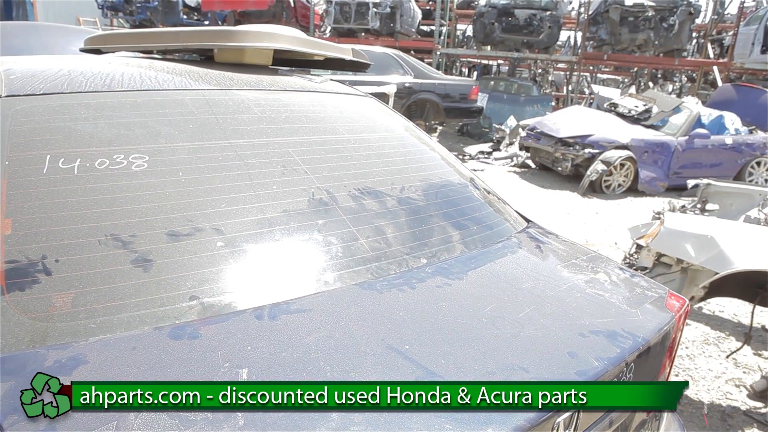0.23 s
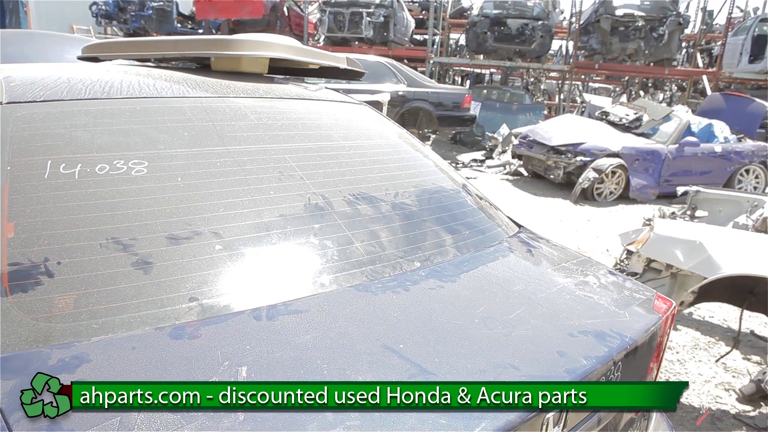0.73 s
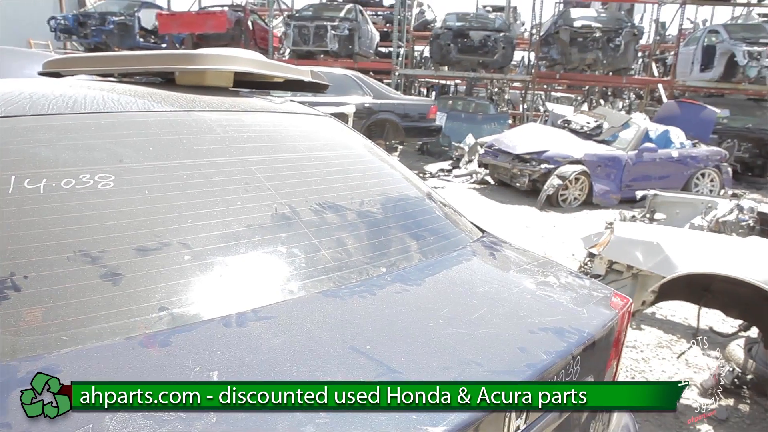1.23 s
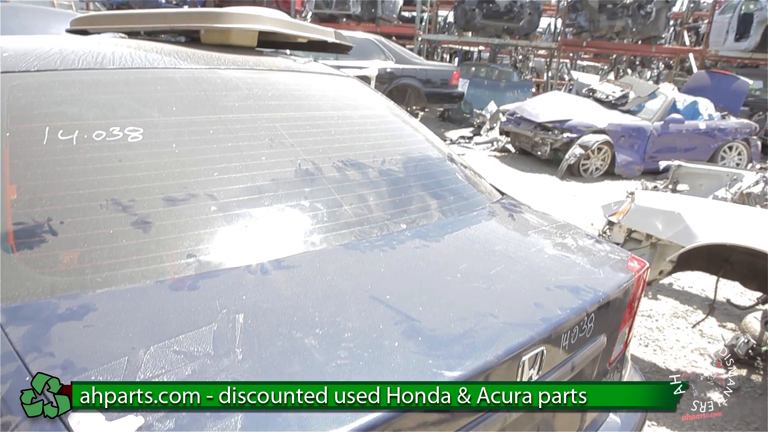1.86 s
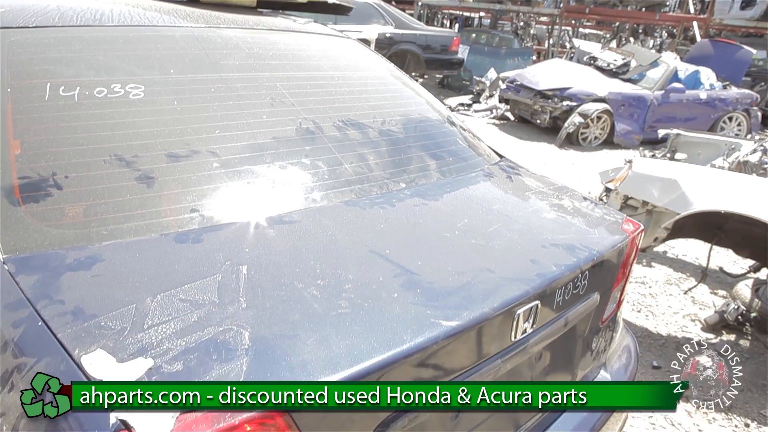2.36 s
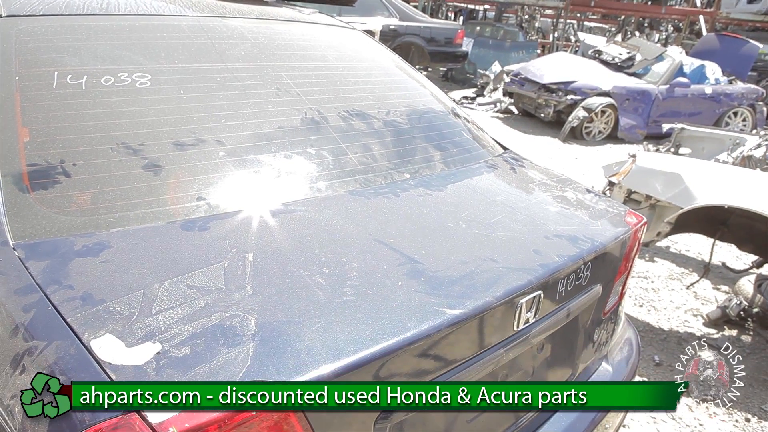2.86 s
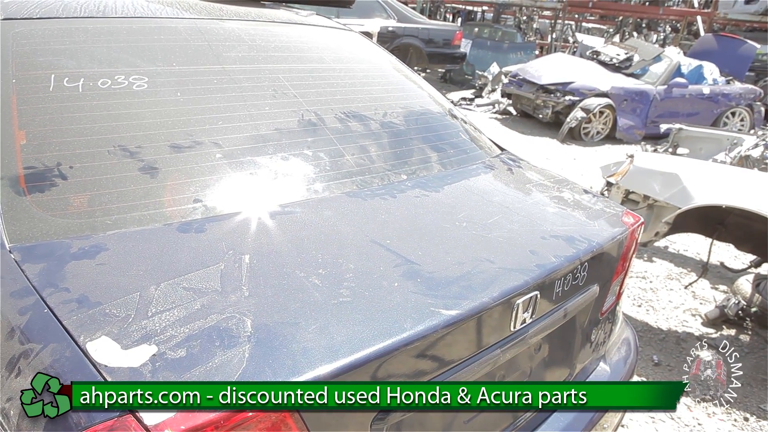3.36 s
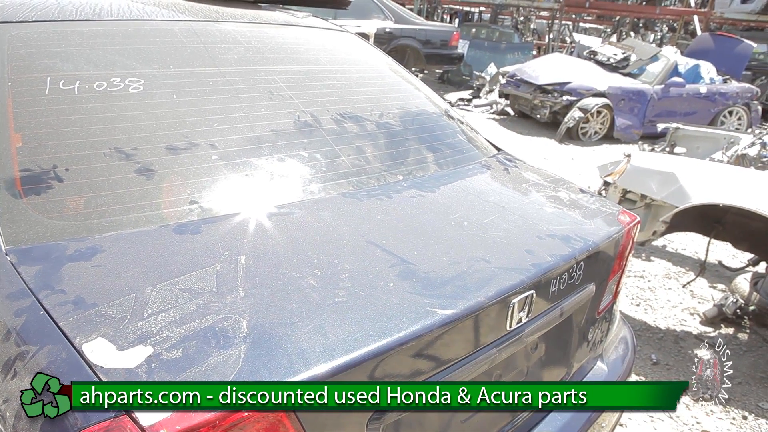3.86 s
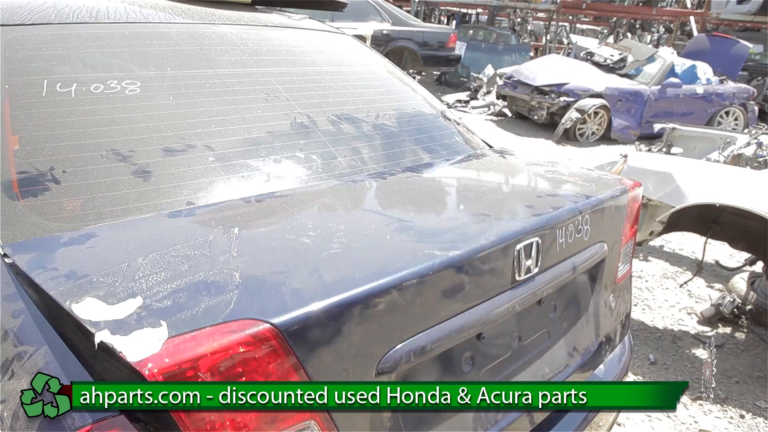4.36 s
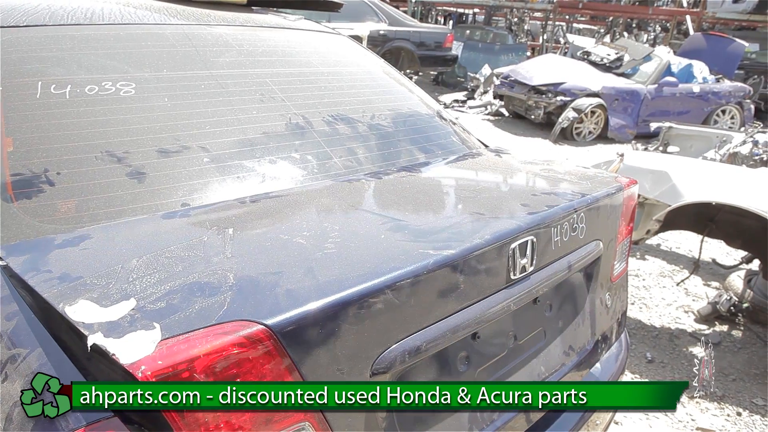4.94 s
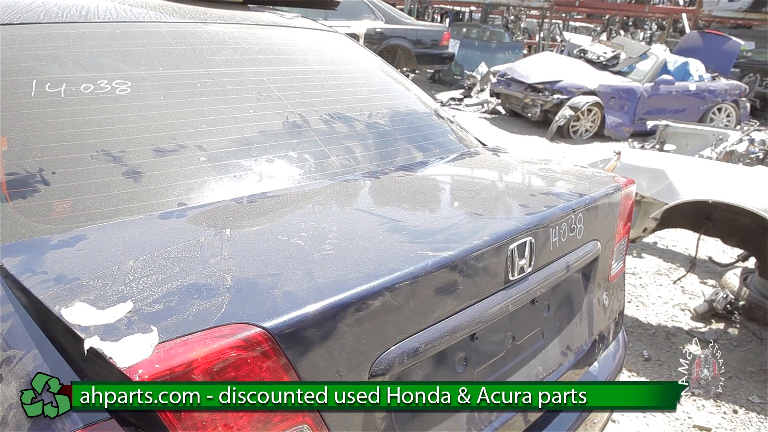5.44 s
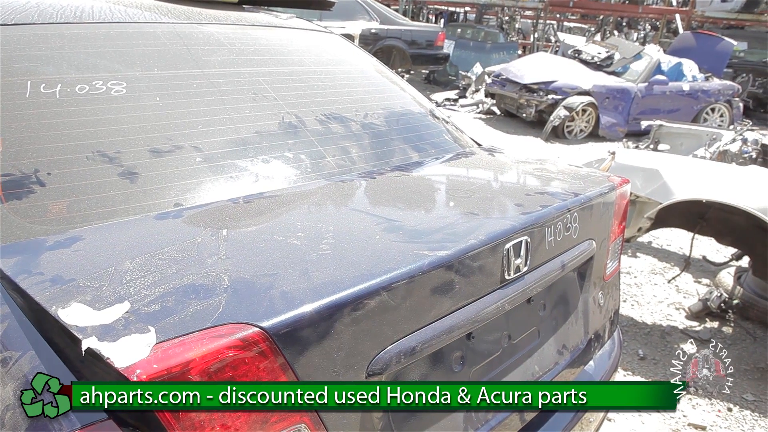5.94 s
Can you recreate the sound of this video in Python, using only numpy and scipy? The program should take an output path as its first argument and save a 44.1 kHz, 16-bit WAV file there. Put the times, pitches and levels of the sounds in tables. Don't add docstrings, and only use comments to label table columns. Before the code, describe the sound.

A near microphone at a car's rear catches restless low rumble, small ticks and dull knocks. One boomy lid push comes first, followed by softer bumps and a hollow knock. A nearby machine hums low underneath. Then the trunk slams with the loudest thump and bright metal clacking, the latch rattles again, and the open yard settles into drone, hiss and faint seal rustle.

```python
import sys
import numpy as np
from scipy import signal
from scipy.io import wavfile
from scipy.ndimage import uniform_filter1d

SR = 44100
rng = np.random.default_rng(int(sys.argv[2]) if len(sys.argv) > 2 else 0)


def output_pcm(signal):
    pcm = np.clip(np.atleast_2d(signal).T, -1, 1) * 32767
    wavfile.write(sys.argv[1], SR, np.round(pcm).astype(np.int16))


def invert_db(x):
    u = np.asarray(x, float) / 20
    return 10 ** u


N = 273861

# frequency in Hz, density in dB per Hz.
RUMBLE_SPECTRUM = [(15, -5), (27, 5), (42, 6), (55, -7.5), (75, -18.5), (120, -69)]
DRONE_SPECTRUM = [(35, -7), (55, 5.5), (75, 4), (100, -13), (135, -19.5), (170, -24.5), (300, -79.5)]
YARD_SPECTRUM = [(82, -12.5), (140, 2.5), (363, -7), (430, -4), (509, -15.5), (569, -7.5), (611, -11),
                 (843, -16.5), (943, -17), (4000, -40), (5200, -76), (8800, -120)]
HISS_SPECTRUM = [(880, -28), (1500, -4.5), (2500, -5.5), (4400, -5.5), (13500, -8.5), (16000, -14)]
SEAL_SPECTRUM = [(300, -29.5), (600, 1), (900, 1), (1500, -3.5), (2500, -16), (5000, -19), (9000, -50)]
HISS_DB, DRONE_DB, YARD_DB = -81.2, -53, -68

# time in seconds, level in dB, pitch in Hz.
CABIN_AIR = [(0, -49, 33.46), (.28, -36.5, 33.05), (.46, -36.5, 25.94), (.7, -39.5, 31.48),
             (1.26, -36.5, 27), (1.48, -40, 26), (1.7, -39.5, 25.76), (2.101, -29.5, 27.96),
             (2.19, -43.5, 27.68), (2.3, -36, 28.7), (2.481, -26, 33.88), (2.6, -35, 38.54), (3.2, -38, 40),
             (3.9, -37.5, 39.95), (4.26, -27, 29), (4.5, -32, 38.52), (4.78, -36.5, 41.05),
             (6.21, -35.5, 41)]
# multiple of the cabin pitch, level in dB.
ENGINE_ORDERS = [(2, -14), (4.5, -31)]
ENGINE_START_S = 2.01
# start in seconds, level in dB, t60 in seconds.
SHAKES = [(0.049, -48, 3.5), (1.13, -35.5, 0.6), (1.49, -38, 4.9), (1.64, -31, 0.3), (1.73, -28, 0.82),
          (2.27, -30, 0.78), (2.45, -45, 1.26), (3.9, -37.5, .6), (3.975, -20.5, .7), (4.2, -41.5, 2.7),
          (4.77, -46.5, 1.26), (5.11, -48.5, 1.86), (5.45, -46, 2.7), (5.801, -43.5, 3.5)]
WAKE_DB, WAKE_T60_S = -60.5, 5.73

# time in seconds, level in dB.
SEAL_CREEP = [
    (4.599, -83),
    (4.814, -85.5),
    (5.103, -66.5),
    (5.258, -68),
    (5.832, -70.5),
    (6.102, -79.5),
    (6.21, -80),
]

# lowest mode in Hz, highest mode in Hz, t60 in seconds, share of the rattle length.
FLOORPAN = (110, 270, .11, 1.1)
PANEL = (292.7, 645, 0.069, 1.02)
SKIN = (645, 1720, 0.049, 1.1)
LATCH = (1720, 5600, 0.013, 1)
FIZZ = (5760, 15800, 0.015, 0.56)
MODE_COUNTS = (6, 10, 24, 60, 60)
LEANS_DB = (0, 1, -8, 6, -5)
DULL_SHARE_DB = (1.5, -0.5, -7, -21.5, -33)
SHARP_SHARE_DB = (-8, 0, -7, -17.5, -20.5)
DULL_TILT = (-0.76, 0, 1.35, 2.1, 3)
SHARP_TILT = (-0.9, -0.5, 0.55, 2.5, 3)
TICK_T60_S, KNOCK_T60_S, CLACK_T60_S = 0.18, 0.13, 0.079

# start in seconds, strength in dB, hardness in dB.
TICKS = [(.243, -73, 0), (.296, -70.5, 6), (.363, -61, 4.5), (.429, -75, 9.5), (.626, -63.5, 5),
         (.923, -62, 4.5), (.968, -63.5, 6), (1.019, -72.5, 6.5), (1.899, -66.5, 3), (2.659, -71, -2),
         (2.731, -62, 1), (2.9, -66, 4.5), (2.939, -64, 2.5), (3.519, -75, 7), (3.66, -72, 0.5),
         (4.868, -71, -4), (5.393, -62.5, 4), (5.519, -75.5, 8), (5.613, -69, 6.5), (6.05, -63.5, 1.5)]
# start in seconds, strength in dB, hardness in dB.
KNOCKS = [(1.093, -61.5, .1), (1.123, -52, 1), (1.177, -54, 1), (1.193, -52.5, -7), (1.239, -64, -3),
          (1.533, -57.5, -1.5), (1.599, -54.5, -5), (1.658, -43.5, 1), (1.675, -43, -2.5), (1.699, -54, -8),
          (2.185, -56, -8), (2.244, -51.5, -5), (2.528, -55.5, -6.5), (2.614, -55.5, 5.5),
          (2.625, -51, 3.5), (3.8, -58, 3), (3.829, -51, 1), (4.41, -47.5, -5), (4.429, -48.5, -5)]
# start in seconds, strength in dB, hardness in dB,
# first gap in seconds, loss per rock in dB.
ROCKS = [
    (1.722, -35.5, -4.5, 0.028, 5.5),
    (2.273, -38.5, -7, .035, 9.5),
    (4.075, -42, -7.5, .028, 4),
]
GAP_GROWTH, HARDENING_DB = 1.2, 1.4

# frequency in Hz, level in dB, t60 in seconds.
BOX_MODES = [(394, 7, 0.19), (664, -19, 0.41), (860, -24, 0.099), (990, -28, 0.14)]
BOX_S, BOX_DB = 2.622, -44.5
# frequency in Hz, level in dB, t60 in seconds.
ROD_MODES = [(2799, -4, .42), (3257, -8, .3), (3408, 0, .6), (3472, -5, .7), (3655, -8, .5),
             (3763, -8, .45), (3892, -5, .42), (4134, -10, .25)]
SLAM_S, ROD_DB, ROD_HELD_S = 3.977, -50.5, 0.339

# start in seconds, panel, skin, latch and fizz levels in dB,
# t60 in seconds.
STRIKER_SLIDE = (3.940, -37, -42, -53, -63, .4)
# start in seconds, strength in dB, hardness in dB.
CLACKS = [(3.871, -46.5, -1), (3.885, -43, 0), (3.898, -37, -0.4), (3.92, -39, -2), (3.972, -15.5, 1.5),
          (3.979, -20, 3), (3.993, -37, 0.5), (4.011, -29.5, 1), (4.028, -31, -1.5), (4.05, -47.5, 4),
          (4.226, -55, -5), (4.247, -57.5, 3), (4.268, -52, 1), (4.288, -42.5, -0.5), (4.303, -35, 0.5),
          (4.324, -37.5, 0.5), (4.349, -28.5, 1.5), (4.359, -39, 2.2), (4.368, -32, 0.2),
          (4.378, -34, -3.5), (4.389, -54, -2), (4.61, -57, 2.5), (5.177, -52.5, 4)]
PAWL_HZ, PAWL_WIDTH_HZ, PAWL_DB = 3390, 780, 2.5

# frequency in Hz, peak level in dB,
# t60 in seconds, rise in seconds, early pitch lift as a share.
THUMPS = [
    (1.7198, [(19.5, -19, .75, .025, 2.0), (28.7, -8, .96, .006, 1.56), (51.4, 2.5, .2, .012, .12), (58.2, -19, .49, .003, 1.9)]),
    (3.9665, [(26.8, -15, 1.2, .04, .64), (20, 7.3, .25, .026, 1.79), (41.2, -2.7, .43, .04, 1.2), (46.7, -5.4, .36, .002, -.4)]),
]


def read(points, hz):
    f, value = np.transpose(points)
    return np.interp(np.log(hz + 1), np.log(f + 1), value)


def add(mix, start_s, sound):
    part = mix[round(start_s * SR):][:len(sound)]
    part += sound[:len(part)]


def noise(spectrum, patchy_db, size):
    hz = np.fft.rfftfreq(size, 1 / SR)
    frames = 4 * N // size + 5
    real, imag, patches = rng.standard_normal((frames, len(hz), 3)).T
    patches = uniform_filter1d(uniform_filter1d(patches, size=8, axis=0), size=8, axis=1)
    level_db = read(spectrum, hz)[:, None] + patchy_db * patches / patches.std()
    z = (real + 1j * imag) * invert_db(level_db)
    x = signal.istft(z, nperseg=size, noverlap=3 * size // 4)[1][:N]
    return x / x.std()


def ring(modes, t):
    hz, db, t60_s = np.transpose(modes)[:, :, None]
    return (invert_db(db - 60 * t / t60_s) * np.sin(2 * np.pi * hz * t)).sum(0)


def hiss():
    return invert_db(HISS_DB) * noise(HISS_SPECTRUM, 0.4, size=1024)


def yard(t):
    wake = invert_db(WAKE_DB - 60 * abs(t - SLAM_S) / WAKE_T60_S) * (t > SLAM_S)
    return (invert_db(YARD_DB) + wake) * noise(YARD_SPECTRUM, 2.8, size=1024)


def shell_drone(t):
    shudder = np.zeros(N)
    for start_s, db, t60_s in SHAKES:
        rise = np.clip((t - start_s) / 0.015, 0, 1)
        shudder += invert_db(db - 60 * abs(t - start_s) / t60_s) * rise
    return (invert_db(DRONE_DB) + shudder) * noise(DRONE_SPECTRUM, 0.5, size=4096)


def cabin_rumble(t):
    time_s, level_db, pitch_hz = np.transpose(CABIN_AIR)
    level_db = np.interp(t, time_s, level_db)
    cycles = np.cumsum(np.interp(t, time_s, pitch_hz)) / SR
    hum = np.sqrt(2) * np.sin(2 * np.pi * cycles)
    orders = sum(invert_db(db) * np.sin(2 * np.pi * k * cycles) for k, db in ENGINE_ORDERS)
    running = np.clip((t - ENGINE_START_S) / 0.3, 0, 1)
    rumble = (0.55 + 0.38 * running) * hum + running * orders
    rumble += (0.85 - 0.3 * running) * noise(RUMBLE_SPECTRUM, 0, size=8192)
    return invert_db(level_db) * rumble


def seal_rustle(t):
    time_s, db = np.transpose(SEAL_CREEP)
    return invert_db(np.interp(t, time_s, db - 2.5, left=-120)) * noise(SEAL_SPECTRUM, 3.5, size=512)


def struck_part(lo_hz, hi_hz, tilt_db, t60_s, count):
    t = np.arange(int(1.2 * t60_s * SR)) / SR
    place, size, life, side = rng.random((4, count, 1))
    place = (np.arange(count)[:, None] + place) / count
    db = tilt_db * place + 8 * size - 60 * t / (t60_s * (0.59 + 0.67 * life))
    hz = lo_hz * (hi_hz / lo_hz) ** place
    modes = np.sign(side - 0.5) * invert_db(db) * np.sin(2 * np.pi * hz * t)
    return modes.sum(0) * (1 - np.exp(-t * lo_hz / 0.18))


def blow(levels_db, t60_s, rise_s):
    t = np.arange(SR // 4) / SR
    grit = rng.standard_normal(len(t)) * invert_db(3.4 * rng.exponential(1, len(t)))
    grit *= 1 - np.exp(-t / rise_s)
    tilts_db = np.clip(1.5 * np.gradient(levels_db), -14, 6) + LEANS_DB
    parts = (FLOORPAN, PANEL, SKIN, LATCH, FIZZ)
    out = np.zeros(len(t))
    for part, count, db, tilt_db in zip(parts, MODE_COUNTS, levels_db, tilts_db):
        lo_hz, hi_hz, ring_s, share = part
        drive = grit * invert_db(-60 * t / (share * t60_s))
        response = struck_part(lo_hz, hi_hz, tilt_db, ring_s, count)
        sound = signal.fftconvolve(drive, response)[:len(t)]
        peak_rms = np.sqrt(uniform_filter1d(sound ** 2, size=300).max())
        out += invert_db(db) * sound / peak_rms
    return out * signal.windows.tukey(2 * len(t), 0.3)[len(t):]


def dull_blows(mix, rows, t60_s):
    for start_s, db, hard_db in rows:
        levels_db = db + np.add(DULL_SHARE_DB, hard_db * np.array(DULL_TILT))
        add(mix, start_s - 0.003, blow(levels_db, t60_s, rise_s=0.0046))


def rocking(start_s, db, hard_db, gap_s, loss_db):
    k = np.arange(4)
    times_s = start_s + gap_s * (GAP_GROWTH ** k - 1) / (GAP_GROWTH - 1)
    return np.transpose([times_s, db - loss_db * k, hard_db + HARDENING_DB * k])


def box_ring(t):
    return invert_db(BOX_DB) * ring(BOX_MODES, t) * (1 - np.exp(-t / 0.0017))


def rod_ring(t):
    held = np.clip((ROD_HELD_S - t) / 0.054, 0, 1)
    return invert_db(ROD_DB) * ring(ROD_MODES, t) * np.clip(t / 0.048, 0, 1) * held


def striker_slide(mix):
    start_s, *levels_db, t60_s = STRIKER_SLIDE
    floorpan_db = levels_db[0] + 9.0
    add(mix, start_s, blow([floorpan_db, *levels_db], t60_s, rise_s=0.02))


def latch_clacks():
    clacks = np.zeros(N)
    for start_s, db, hard_db in CLACKS:
        levels_db = db + np.add(SHARP_SHARE_DB, hard_db * np.array(SHARP_TILT))
        add(clacks, start_s - 0.002, blow(levels_db, CLACK_T60_S, rise_s=0.00058))
    b, a = signal.iirpeak(PAWL_HZ, PAWL_HZ / PAWL_WIDTH_HZ, SR)
    return clacks + invert_db(PAWL_DB) * signal.lfilter(b, a, clacks)


def thump(modes):
    t = np.arange(SR) / SR
    early_s = 0.012 * (1 - np.exp(-t / 0.012))
    out = np.zeros(SR)
    for hz, db, t60_s, rise_s, lift in modes:
        envelope = invert_db(db - 60 * t / t60_s) * (1 - np.exp(-t / rise_s))
        out -= envelope * np.sin(2 * np.pi * hz * (t + lift * early_s))
    return out


def scene():
    t, ring_t = np.arange(N) / SR, np.arange(SR // 2) / SR
    mix = hiss() + yard(t) + shell_drone(t) + cabin_rumble(t) + seal_rustle(t)
    dull_blows(mix, TICKS, TICK_T60_S)
    dull_blows(mix, KNOCKS, KNOCK_T60_S)
    for row in ROCKS:
        dull_blows(mix, rocking(*row), KNOCK_T60_S)
    add(mix, BOX_S, box_ring(ring_t))
    add(mix, SLAM_S, rod_ring(ring_t))
    striker_slide(mix)
    mix += latch_clacks()
    for start_s, modes in THUMPS:
        add(mix, start_s, thump(modes))
    return mix[None]


def low_pass(x):
    return signal.sosfilt(signal.butter(12, 16230, fs=SR, output="sos"), x)


def record(dry):
    edge = signal.firwin(255, 15900, window=("kaiser", 8), fs=SR)
    rounded = np.tanh(dry / 0.95)
    return low_pass(signal.oaconvolve(rounded, edge[None], "same"))


dry = scene()
out = record(dry)
output_pcm(out)
```